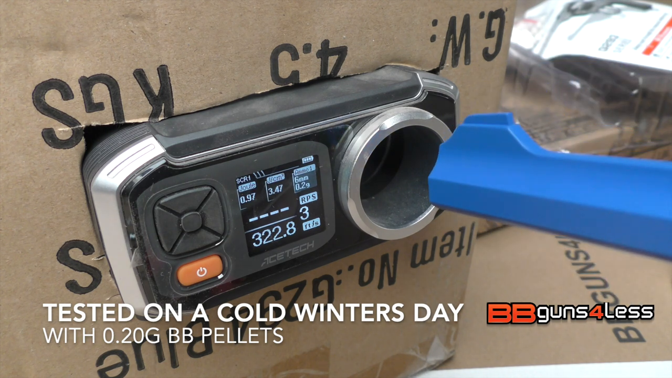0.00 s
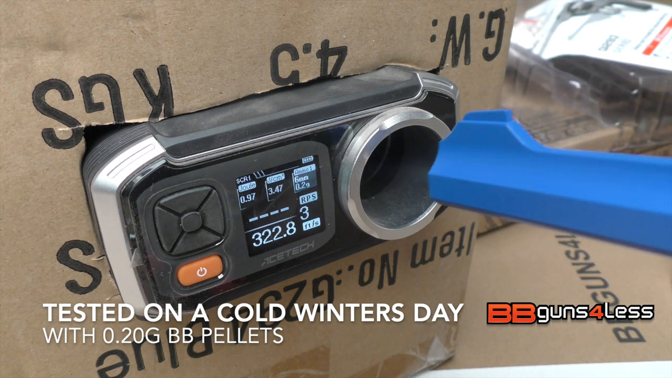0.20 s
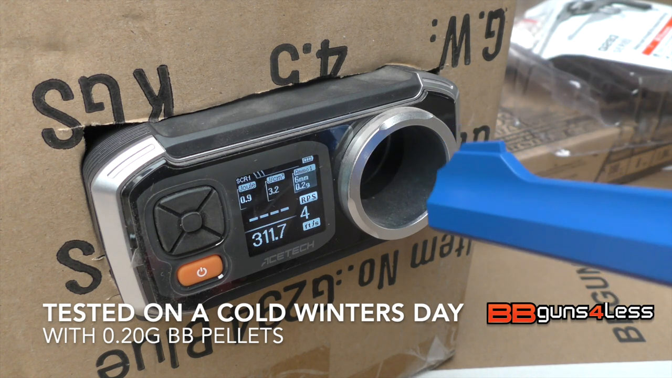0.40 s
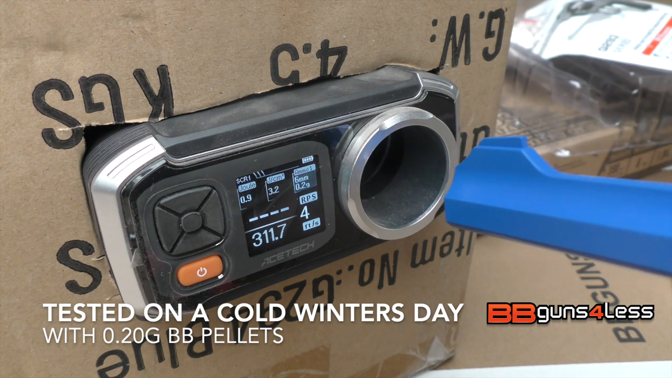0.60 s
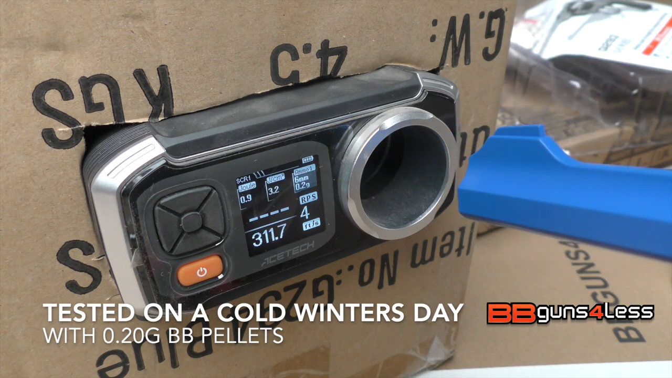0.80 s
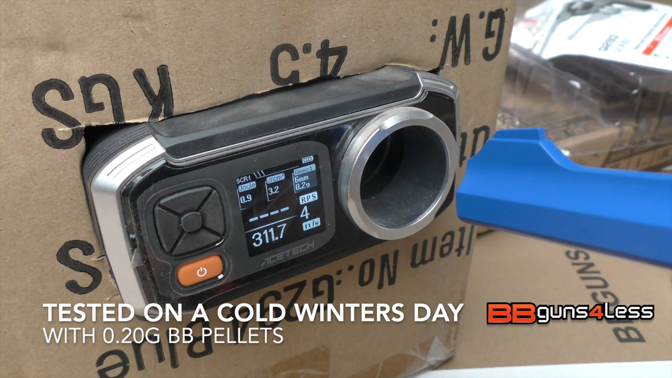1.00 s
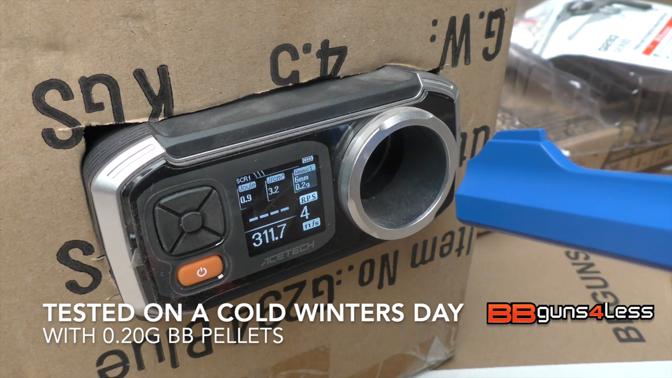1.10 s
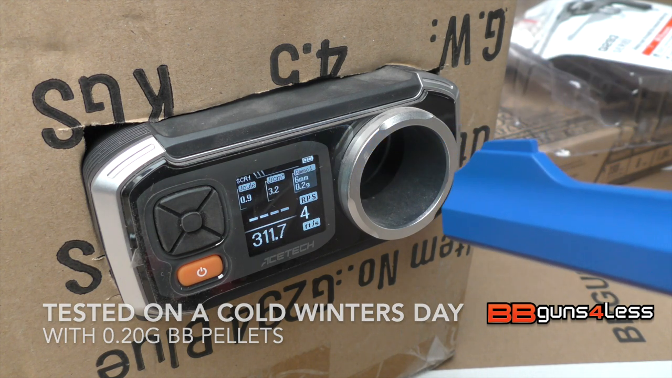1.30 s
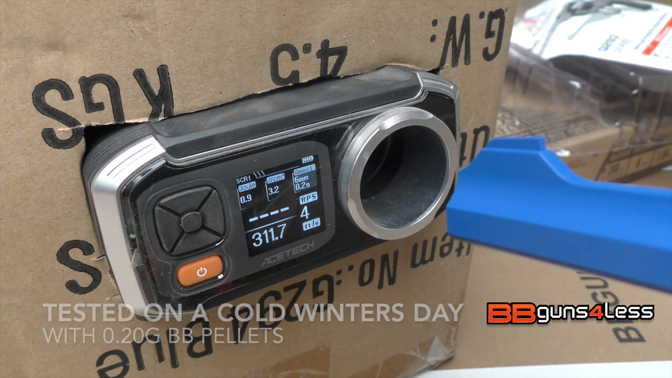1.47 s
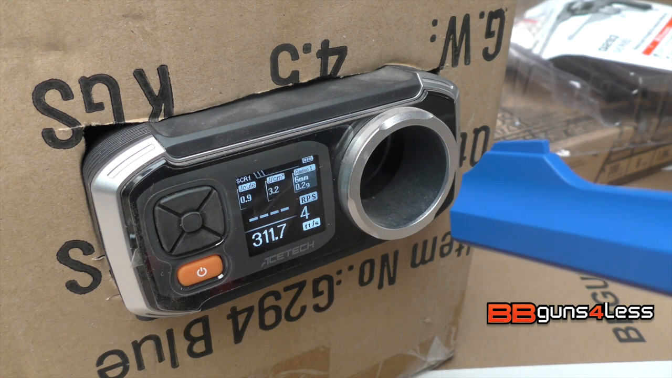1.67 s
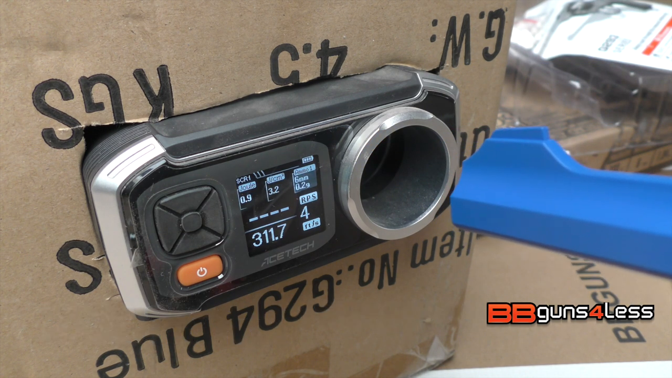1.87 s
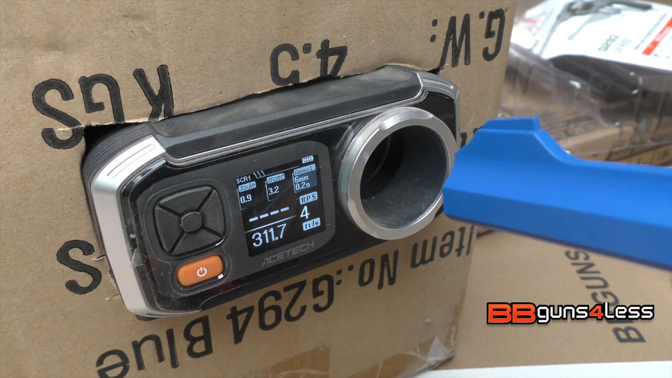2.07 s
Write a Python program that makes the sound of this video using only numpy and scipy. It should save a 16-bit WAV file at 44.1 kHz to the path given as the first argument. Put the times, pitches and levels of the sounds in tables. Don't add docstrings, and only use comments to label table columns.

```python
import sys
import numpy as np
from scipy import signal
from scipy.fft import rfft, irfft, next_fast_len
from scipy.io import wavfile
from scipy.ndimage import map_coordinates

SR = 44100
rng = np.random.default_rng(int(sys.argv[2]) if len(sys.argv) > 2 else 0)


def dump(signal):
    limited = np.clip(np.atleast_2d(signal).T, -1, 1)
    pcm = np.round(limited * 32767).astype(np.int16)
    wavfile.write(sys.argv[1], SR, pcm)


def undo_db(level):
    steps = np.asarray(level, float) / 20
    return 10 ** steps


N = 92610
T = np.arange(N) / SR

# (start [s], level [dB], t60 [s], left-right difference [dB])
HAMMER_BURSTS = [
    (.2060, -10, 0.0085, -10.5),
    (.2074, -25.5, 0.018, -2.5),
    (.2105, -28, 0.047, -21.5),
    (.2020, -50, .05, -6),
]
BLAST_BURSTS = [
    (.2160, -10.5, 0.02, -1),
    (.2172, -11.5, 0.016, -1),
    (.2209, -12.5, 0.007, 2.5),
    (.2238, -21.5, 0.03, 2.5),
    (.2306, -17, 0.024, -3),
    (.2380, -29.5, 0.15, -2.5),
]
PELLET_BURSTS = [
    (.3188, -20, .07, 1),
    (.3230, -10, .014, 1),
    (.3325, -24, .02, 1),
]
TRIGGER_BURSTS = [
    (.4015, -25, 0.022, 1.5),
    (.4040, -14, 0.016, -1.5),
    (.4101, -2.5, 0.0044, -12),
    (.4110, -8.5, 0.018, -1.5),
    (.4065, -20, 0.033, 0),
    (.4208, -25, .03, 0),
]
STOP_TICKS = [
    (1.7716, -56, .03, -3),
    (1.9003, -50, .01, -2),
    (1.9016, -44, .01, -2),
]
SEEP_BURSTS = [
    (.236, -34.5, 0.71, 0.5),
    (.33, -36, 0.44, 0),
]

# (frequency [Hz], density [dB per Hz])
HAMMER_SPECTRUM = [(600, -16), (1700, -2), (3600, -2.5), (6400, -12), (7600, -7), (10000, -5), (13500, -15),
                   (16400, -34)]
BLAST_SPECTRUM = [(500, -16.5), (900, -20.5), (1400, -0.5), (3300, -6), (5000, -2), (7500, -9.5),
                  (11000, 0.5), (16400, -14)]
PELLET_SPECTRUM = [(300, -14), (650, -14), (1150, 0), (3000, -6), (8000, -5), (10000, -16), (14500, -16),
                   (16400, -40)]
TRIGGER_SPECTRUM = [(800, -25), (1700, -7), (2800, -4.5), (6000, -4), (9000, -4), (13000, -1.5),
                    (15800, -21), (16500, -34)]
TICK_SPECTRUM = [(1000, -22), (1700, 4), (2400, 2), (3200, -5), (5000, -10), (5800, -18), (9000, -56.5)]
SEEP_SPECTRUM = [(6000, -14), (10000, 1.5), (13000, -2.5), (15700, -9.5), (15900, -50)]

# (time [s], peak [dB], left-right difference [dB])
CONTACTS = [
    (.2163, -2, -6),
    (.2172, 3, 4),
    (.2212, 0, 8),
    (.2310, -6, -2),
    (.3236, -2, 1),
    (.4047, -3, 0),
    (.4102, 7, -6),
    (.4114, 4, -6),
]
# (frequency [Hz], level [dB])
CONTACT_SPECTRUM = [(1500, -10), (3000, 0), (12000, 0), (16000, -8)]

# (start [s], frequency [Hz], level [dB], t60 [s], left-right difference [dB])
PART_MODES = [(.2060, 3600, -6, .0045, -18), (.2061, 4500, -10, .006, -12), (.2062, 2100, -17, .008, -12),
              (.2064, 1400, -17, .009, -10), (.2070, 7540, -18, .012, 4), (.2085, 9900, -16, .013, -2),
              (.2105, 9950, -16, .03, -18), (.2120, 13500, -22, .012, 0), (.2090, 3900, -24, .05, -14),
              (.2176, 2790, -8, .02, 0), (.21975, 2790, -9, .016, 2), (.2163, 5950, -4.5, .013, 3),
              (.2161, 3980, -5, .013, -8), (.2170, 1960, -17, .03, 0), (.2165, 9850, -15, .02, 0),
              (.2200, 10900, -19, .03, -5), (.2306, 5950, -15, .012, 0), (.2306, 5200, -18, .012, 0)]
LATE_MODES = [(.2420, 2790, -24, .2, 0), (.3190, 1150, -22, .08, 0), (.3480, 1250, -32, .15, 0),
              (.3680, 1400, -33, .15, 0), (.4038, 8300, -19, .012, 0), (.4042, 12000, -19, .01, 0),
              (.4066, 8400, -19, .025, 0), (.4055, 4200, -19, .015, 0), (.4101, 12900, -3, .008, -4),
              (.4108, 5600, -5, .008, -3), (.4108, 10500, -8, .008, -3), (.4112, 1900, -13, .014, -2),
              (.4115, 3900, -10, .01, -2), (1.7712, 3100, -33, .008, -3), (1.7722, 2800, -31, .005, -3),
              (1.7712, 1800, -33, .009, -3), (1.7722, 2300, -32, .005, -3), (1.9003, 3000, -43, .006, -2),
              (1.9017, 1850, -36, .006, -2), (1.9017, 2900, -37, .005, -2), (1.9015, 3800, -42, .005, -2),
              (1.9015, 4500, -40, .005, -2)]
AIR_MODES = [
    (.2187, 385, -8, .018, -6),
    (.2313, 300, -7.5, .017, -5),
    (.4085, 110, -32, .04, 0),
    (.2190, 290, -15, .03, -2),
    (.2330, 115, -30, .22, 2),
    (.2600, 200, -37, .4, 0),
    (.2400, 307, -37, .2, -2),
]
WALL_MODES = [
    (.2175, 560, -19, .02, -5),
    (.2165, 1370, -11, .022, -3),
    (.2245, 1300, -15, .025, 0),
    (.2306, 1200, -16, .02, -2),
]

# (start [s], length [s], level [dB])
RUB_STROKES = [
    (0.14, .18, -58),
    (.22, .2, -36.5),
    (0.2, 0.64, -68.5),
    (1.05, 0.29, -59),
    (1.3, 0.357, -66),
    (1.67, 0.12, -64.5),
    (1.66, .7, -63),
    (1.816, 0.11, -66),
]
# (frequency [Hz], density [dB per Hz])
RUB_SPECTRUM = [(800, -23), (1400, 4), (2850, 1.5), (4000, -1.5), (7000, -9.5), (11500, -10.5),
                (15500, -17.5)]
# (frequency [Hz], half width [Hz], level [dB])
CREAK_MODES = [(2800, 200, -61.5), (3830, 180, -70), (11460, 120, -70)]

# (time [s], level [dB])
HALL_BLOWS = [
    (0.219, -19.5),
    (.325, -23),
    (0.416, -34),
]
# (frequency [Hz], t60 [s])
HALL_DECAY = [(200, .8), (700, 0.89), (1400, 0.92), (3000, 1.0), (6000, 0.7), (12000, 0.26)]
# (frequency [Hz], level [dB])
HALL_SPECTRUM = [(250, -17), (800, -15), (1250, -2.5), (1800, -6.5), (2500, -3.5), (6000, -5), (14600, -13),
                 (15300, -47)]

# (frequency [Hz], density [dB per Hz])
HUM_SPECTRUM = [(15, -68), (35, -20), (81, -2), (162, -2), (220, -7.5), (295, -7.5), (436, -14.5),
                (700, -29.5), (910, -55.5), (1540, -120)]
# (frequency [Hz], density [dB per Hz])
HISS_SPECTRUM = [(650, -14.5), (900, -9), (1300, -4.5), (2500, -18), (5000, -31.5), (12000, -24),
                 (15700, -22.5), (15900, -73.5)]
# (frequency [Hz], left-right likeness [1])
AIR_LIKENESS = [(60, 0.85), (240, 0.7), (950, 0.87), (3770, 0.68), (5700, 0.93), (9000, .95), (12000, .75),
                (15000, 0.73)]
# (time [s], level [dB])
GAIN_CURVE = [
    (.2, 0),
    (.224, -1),
    (.245, -13),
    (.33, -11),
    (.405, -8),
    (.421, -14.5),
    (.5, -5),
    (.54, 0),
]


def unit(x):
    return x / np.sqrt(np.mean(x ** 2) + 1e-20)


def along(points, hz):
    f, v = np.transpose(points)
    return np.interp(np.log(hz + 1), np.log(f + 1), v)


def closed(points):
    first_hz, first_db = points[0]
    extended = [(first_hz / 2, first_db - 40)] + list(points)
    return lambda hz: undo_db(along(extended, hz))


def wobble(rate):
    knots = rng.standard_normal(int(N * rate / SR) + 4)
    return map_coordinates(knots, [T * rate])


def filtered(x, response):
    m = next_fast_len(N + 8192)
    spectrum = rfft(x, m) * response(np.fft.rfftfreq(m, 1 / SR))
    return irfft(spectrum, m)[..., :N]


def pair(response, alike):
    def mid_side(hz):
        turn = np.arccos(np.clip(along(alike, hz), -1, 1)) / 2
        return response(hz) * [np.cos(turn), np.sin(turn)]
    mid, side = filtered(rng.standard_normal((2, N)), mid_side)
    return unit(np.array([mid + side, mid - side]))


def sides(pan_db):
    return undo_db(np.array([[pan_db / 2], [-pan_db / 2]]))


def struck(start, t60, attack):
    t = np.maximum(T - start, 0)
    return (1 - np.exp(-t / attack)) * undo_db(-60 * t / t60)


def bursts(rows, spectrum, alike, attack):
    shape = sum(undo_db(db) * sides(pan_db) * struck(s, t60, attack) for s, db, t60, pan_db in rows)
    ragged = undo_db(1.5 * wobble(1500))
    return shape * ragged * pair(closed(spectrum), [(1000, alike)])


def ringing(rows, attack, lag_s=0):
    late = np.array([[0], [lag_s]])
    total = 0
    for s, hz, db, t60, pan_db in rows:
        tone = np.sin(2 * np.pi * hz * (T - s - late))
        total = total + undo_db(db) * sides(pan_db) * struck(s + late, t60, attack) * tone
    return total


def muzzle_blast():
    return bursts(BLAST_BURSTS, BLAST_SPECTRUM, .7, .0002)


def gas_puff():
    start, hz = .2160, 125
    push = struck(start, .042, .001) * np.sin(2 * np.pi * hz * (T - start))
    return undo_db(-9) * push * [[1], [-.6]]


def hammer():
    return bursts(HAMMER_BURSTS, HAMMER_SPECTRUM, .8, .00015)


def trigger_reset():
    return bursts(TRIGGER_BURSTS, TRIGGER_SPECTRUM, 0.43, 0.000068)


def contact_cracks():
    spikes = np.zeros((2, N))
    for s, db, pan_db in CONTACTS:
        spikes[:, round(s * SR)] = -undo_db(db) * sides(pan_db)[:, 0]
    return filtered(spikes, closed(CONTACT_SPECTRUM))


def ringing_parts():
    return ringing(PART_MODES, .0004) + ringing(LATE_MODES, 0.00083)


def carton():
    rebound = bursts(PELLET_BURSTS, PELLET_SPECTRUM, 0.98, .0008)
    wall = ringing(WALL_MODES, 0.00074, lag_s=.00027)
    return rebound + ringing(AIR_MODES, 0.00053) + wall


def gas_seep():
    return bursts(SEEP_BURSTS, SEEP_SPECTRUM, 0.95, .004)


def cylinder_stop():
    return bursts(STOP_TICKS, TICK_SPECTRUM, 0.61, 0.00015)


def stroke(start, length):
    phase = np.clip((T - start) / length, 0, 1) ** .75
    return np.sin(np.pi * phase) ** .9


def resonance(hz, width):
    return lambda f: width * width / ((f - hz) ** 2 + width * width)


def rubbing():
    strokes = sum(undo_db(db) * stroke(s, length) for s, length, db in RUB_STROKES)
    rub = strokes * pair(closed(RUB_SPECTRUM), [(1000, 0.58)])
    creak = sum(undo_db(db) * pair(resonance(hz, width), [(1000, 0.36)]) for hz, width, db in CREAK_MODES)
    return undo_db(0.92 * wobble(60)) * (rub + stroke(1.67, .115) * creak)


def hall():
    tube_hz, tube_width_hz, tube_lift = 2790, 35, .9
    build_s = .006

    def colour(f):
        tube = tube_lift / (1 + ((f - tube_hz) / tube_width_hz) ** 2)
        return closed(HALL_SPECTRUM)(f) * (1 + tube)

    hz, t, z = signal.stft(pair(colour, [(1000, .6)]), SR, nperseg=128)
    t60 = along(HALL_DECAY, hz)[:, None]
    power = 0
    for s, db in HALL_BLOWS:
        since = np.maximum(t - s, 0)
        power = power + (undo_db(db - 60 * since / t60) * (1 - np.exp(-since / build_s))) ** 2
    tail = signal.istft(z * np.sqrt(power), SR, nperseg=128)[1][:, :N]
    return sides(-1) * tail


def ventilation():
    hum_level = undo_db(-56.5 + 1.1 * wobble(12) + 1.2 * wobble(0.67))
    hum = hum_level * pair(closed(HUM_SPECTRUM), AIR_LIKENESS)
    hiss_level = undo_db(-59.5 + 0.82 * wobble(3.4) + 1.6 * wobble(17))
    return hum + hiss_level * pair(closed(HISS_SPECTRUM), AIR_LIKENESS)


def scene():
    gun = muzzle_blast() + gas_puff() + hammer() + trigger_reset() + contact_cracks() + ringing_parts()
    small = gas_seep() + cylinder_stop() + rubbing()
    return gun + carton() + small + hall() + ventilation()


def band_limit(x):
    return signal.sosfilt(signal.butter(12, 16530, fs=SR, output="sos"), x)


def record(dry):
    clip_top, clip_hardness = 1.03, 8
    x = dry * undo_db(np.interp(T, *np.transpose(GAIN_CURVE)))
    x = x / (1 + np.abs(x / clip_top) ** clip_hardness) ** (1 / clip_hardness)
    x = filtered(x, lambda hz: hz < 16500)
    return band_limit(x)


dry = scene()
out = record(dry)
dump(out)
```